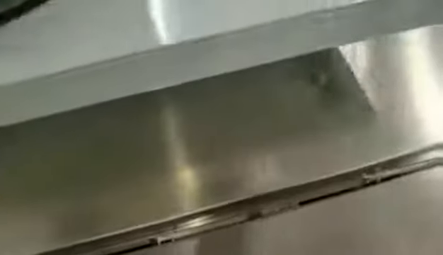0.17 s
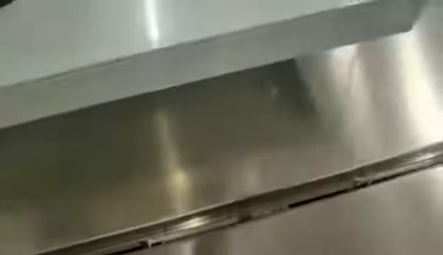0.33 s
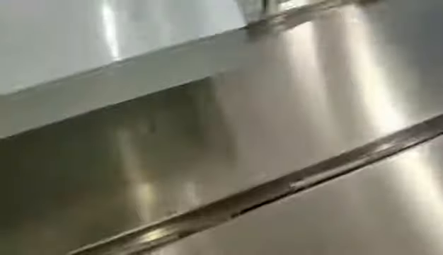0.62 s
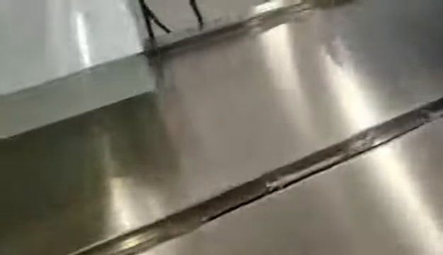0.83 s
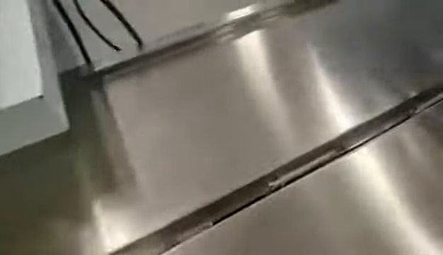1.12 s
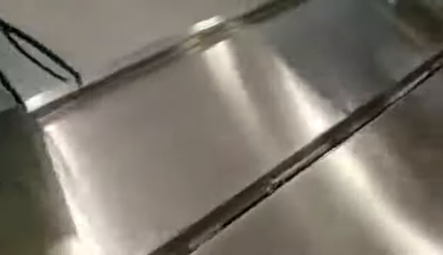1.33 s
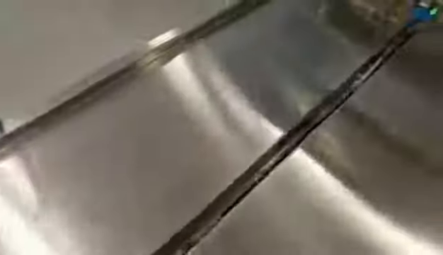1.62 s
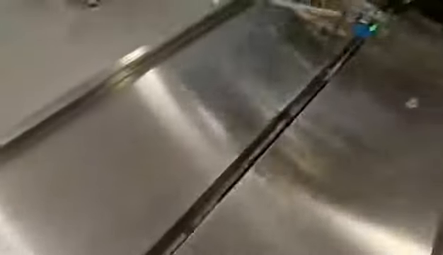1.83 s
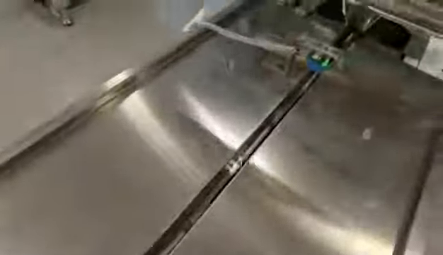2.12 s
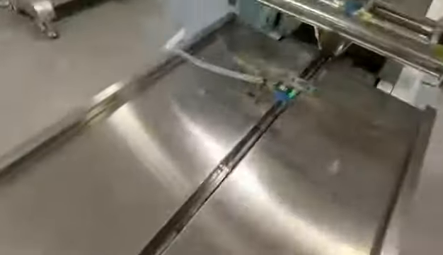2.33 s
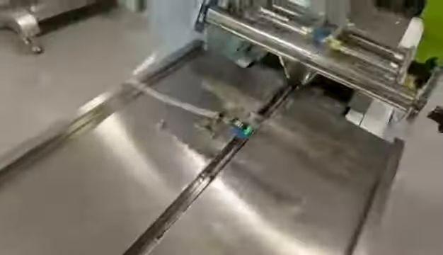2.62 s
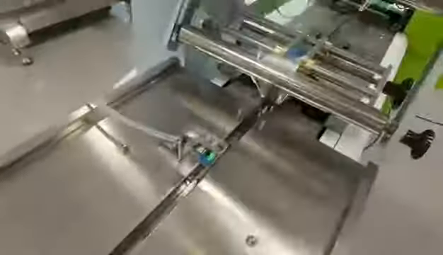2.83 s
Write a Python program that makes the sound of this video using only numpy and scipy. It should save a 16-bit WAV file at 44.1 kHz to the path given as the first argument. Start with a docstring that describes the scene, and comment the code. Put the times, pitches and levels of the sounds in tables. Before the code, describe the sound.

A packaging machine hisses with compressed air, bright and left-leaning, over dull rumble and wavering low hum in a workshop. Carriage knocks clatter softly near 0.2 s, strongly around 0.95, lighter near 1.7 and sharply at 2.44, ringing frame and sheet metal with short room reverberation. Brief air puffs come near 0.8, 1.0, 2.55 and 2.9. From about 1.1 to 1.65 s the hiss drops and stays fainter.

```python
"""Compressed air hisses over a dull rumble and a motor hum, and every three quarters of a second a carriage knocks.
The place is a workshop: the listener walks along a packaging machine's steel deck, away from the air jets.
Air and rumble are banded noise, the hum is five mains harmonics, and exhaust puffs are short noise bursts.
Each knock is a few contacts that ring the frame and its sheet-metal panels, close by and in the room.
Two microphone ports, left and right, hear it all; narrow patches of the noises swell and fade."""
import sys
import numpy as np
from scipy import signal
from scipy.fft import rfft, irfft
from scipy.io import wavfile
from scipy.ndimage import uniform_filter1d

SR = 44100
rng = np.random.default_rng(int(sys.argv[2]) if len(sys.argv) > 2 else 0)


def boost(x):
    """Linear amplitude factor 10**(x/20) for a level x in decibels (scalar or array-like)."""
    u = np.asarray(x, float) / 20
    return 10 ** u


def to_wav(s):
    """Save 16-bit WAV."""
    ch = np.atleast_2d(s).T  # columns
    pcm = np.round(np.clip(ch, -1, 1) * 32767)  # PCM
    wavfile.write(sys.argv[1], SR, pcm.astype(np.int16))


N = 130977

# Hiss of the air jets before its trim: t/s, level/dB, left over right/dB
AIR_LEVEL = [(0.0, -27, 9.5), (0.04, -31.5, -0.5), (0.07, -27, 8.5), (0.17, -29.5, 4.5), (0.42, -28.5, 5),
             (0.58, -31, 5.5), (0.84, -28.5, 2.5), (0.87, -33, 6), (0.95, -27.5, 4.5), (1.1, -28.5, 4.5),
             (1.65, -35.5, 2.5), (1.77, -36, 4.5), (2.4, -36, 1), (2.47, -32.5, 2), (2.74, -37, 5),
             (2.97, -36, 4)]
# Relative spectrum of the jets: f/Hz, density/dB per Hz
AIR_SPECTRUM = [(800, -10), (975, -6), (1250, -12.5), (1600, -7.5), (2060, -1), (2500, -10), (3200, -4.5),
                (3800, -7.5), (4700, -6.5), (5800, 1), (6600, -0.5), (7700, -2)]
# Workshop rumble before its trim, dipping just before each stroke lands: t/s, level/dB
RUMBLE_LEVEL = [(0, -26.5), (.12, -33), (.3, -33), (.5, -35.5), (.8, -34.5), (.88, -38.5), (.93, -31.5),
                (1.17, -35.5), (1.31, -35), (1.55, -32.5), (1.63, -40), (1.69, -31), (1.9, -36),
                (2.05, -37), (2.2, -35.5), (2.38, -36), (2.46, -32.5), (2.6, -35.5), (2.97, -34.5)]
# Relative spectrum of the rumble: f/Hz, density/dB per Hz
RUMBLE_SPECTRUM = [(15, -21.5), (30, -13.5), (71, -4), (158, 0), (322, -3), (388, -10.5), (647, -13),
                   (1060, -15), (1500, -15.5), (2040, -15), (4000, -22), (5200, -59), (8800, -120)]
# Motor hum as the listener crosses its standing waves: t/s, level/dB of harmonics 1, 2, 3, 4, 5
HUM_LEVEL = [(0.0, -29, -45, -27.5, -24, -36.5), (0.11, -32, -44, -47.5, -55, -41.5),
             (0.261, -33, -38, -30, -31, -31), (0.36, -29, -34.5, -36, -44.5, -58),
             (0.43, -35, -66, -35.5, -35.5, -50.5), (0.801, -36.5, -33, -35.5, -40.5, -33.5),
             (0.88, -36, -37, -50, -68, -69), (0.94, -35.5, -34, -36, -32, -27.5),
             (1.22, -32.5, -42.5, -43, -38.5, -47.5), (1.35, -40, -31.5, -43, -35.5, -37),
             (1.5, -40.5, -33, -32, -45, -58), (1.56, -43, -29.5, -28, -39.5, -43),
             (1.63, -40, -35, -58, -59, -53), (1.69, -41.5, -41, -58, -41, -27),
             (1.96, -45, -53, -49.5, -43.5, -52.5), (2.31, -46, -29.5, -37.5, -59, -54),
             (2.42, -51.5, -36.5, -70, -39.5, -37.5), (2.97, -60, -36, -31.5, -42, -41)]
# Balance of the hum, one value a harmonic: left over right/dB
HUM_LEFT_DB = [8.3, 4.3, 5.9, 5.3, 1.4]
# Mean phase lag of the hum at the right port, one value a harmonic: phase/rad
HUM_RIGHT_RAD = [0.86, 0.51, .2, 0.22, 0.15]
# Faint whistles in the air, before they follow the hiss: f/Hz, level/dB
WHISTLES = [(1650, -58.5), (2085, -51.5), (2552, -69.5), (5929, -62), (6093, -65), (6410, -67), (7406, -59)]
# Carriage contacts: t/s, level into the frame/dB, level into the panels/dB
CONTACTS = [(0.182, -19, -25), (0.233, -18.5, -25.5), (0.279, -23, -51), (0.572, -26, -41.5),
            (0.739, -21, -31), (0.917, -25.5, -21), (.942, -14, -23.5), (0.964, -25, -31.5),
            (.994, -18, -28), (1.019, -36, -23.5), (1.044, -34, -49.5), (1.31, -26.5, -49),
            (1.349, -25.5, -36.5), (1.668, -26.5, -29), (1.701, -22, -30.5), (1.723, -26, -29.5),
            (1.739, -25, -38), (1.776, -31, -28), (2.414, -26, -27), (2.434, -26, -18.5),
            (2.441, -12, -24.5), (2.457, -17.5, -30.5), (2.478, -17.5, -29.5), (2.496, -22, -33.5),
            (2.512, -26, -35), (2.535, -25, -46.5), (2.699, -31, -57), (2.89, -30.5, -56)]
# Ringing modes of the frame: f/Hz, relative level/dB, t60/s
FRAME_MODES = [(197, -0.5, 0.15), (222.5, 2, 0.13), (243, -3, 0.071), (301.6, -3, 0.13),
               (340.5, -2.5, 0.13), (366.4, -8, 0.095), (413, -9, 0.22), (446, -9.5, 0.089),
               (517.4, -10, 0.08), (627, -19, 0.044)]
# Ringing modes of the sheet-metal panels: f/Hz, relative level/dB, t60/s
PANEL_MODES = [(940, -12, 0.055), (1161, -8.5, 0.088), (1357, -3.5, 0.041), (1588, -5.5, 0.068),
               (1783, -4.5, 0.036), (1927, 1, 0.079), (2003, -2, 0.044), (2087, -0.5, 0.06),
               (2240, -8, .04), (2366, -8.5, 0.049), (2534, -6, 0.099), (2786, -3, 0.12),
               (3050, -11.5, .04), (3170, -14, .05)]
# Exhaust puffs of the valves: t/s, level/dB, decay t60/s
VALVE_PUFFS = [(0.816, -21.5, 0.17), (0.999, -28.5, 0.21), (2.45, -40, 0.31), (2.553, -32, 0.17),
               (2.88, -32.5, 0.16)]
# Share of the noise power that both ports have in common: f/Hz, likeness 0 to 1
LIKENESS = [(60, 0.97), (240, 0.91), (500, 0.61), (800, 0.3), (1200, 0.41), (2000, 0.22), (2600, 0.32),
            (3700, 0.25), (8000, 0.051)]

MAINS_HZ = 50.08
HUM_WAVER_DB, HUM_WANDER_RAD = 2.5, 0.55
AIR_BUZZ = 0.045  # depth of the motor's pulse in the jets
WHISTLE_WIDTH_HZ = 12  # of each of the two resonators in a row
RIGHT_LAG_S, LAG_ABOVE_HZ = 0.0004, 850
CONTACT_S, RATTLE_S, MODE_SPREAD_DB = 0.003023, 0.019, 4
KNOCK_LOW_HZ, KNOCK_LEFT_DB, PANEL_LIKENESS = 171, 4, 0.4
PUFF_LOW_HZ, PUFF_RISE_S = 2500, 0.012
ROOM_T60_S, WALL_CUT_HZ, ROOM_DB = 0.34, 2200, -11
# Patches in the noises: depth against a plain gain of 1, power share of each port's own pattern
PATCH_SHARE, PATCH_OWN = 0.49, 0.66
PATCH_HZ, PATCH_S = 110, 0.064  # smoothing width of each of two passes
CUTOFF_HZ = 7520


def rms_one(x):
    """Scale to rms 1."""
    return x / np.sqrt(np.mean(x ** 2) + 1e-20)


def in_time(rows):
    """Read the columns of a curve, one value a sample."""
    s, *columns = np.transpose(rows)
    return [np.interp(np.arange(N) / SR, s, column) for column in columns]


def at_hz(points, hz):
    """Read a spectrum on a log-frequency axis."""
    f, value = np.transpose(points)
    return np.interp(np.log(hz), np.log(f), value)


def lean_left(db):
    """Gains of the left and right port, db apart."""
    return boost(np.array([[0.5], [-0.5]]) * db)


def at_ports(alike, lag, both, left, right):
    """Mix shared noise, later by lag samples at the right port, with noise of each port's own."""
    shared = np.array([both, np.roll(both, lag)])
    own = np.array([left, right])
    return np.sqrt(alike) * shared + np.sqrt(1 - alike) * own


def drift(rate_hz):
    """Slow random wandering of rms about 1: low-passed noise."""
    step = 40  # samples between drawn values
    r = np.exp(-2 * np.pi * rate_hz * step / SR)
    noise = rng.standard_normal(N // step + 2002)
    slow = rms_one(signal.lfilter([1], [1, -2 * r, r * r], noise)[2000:])  # settled part
    return np.interp(np.arange(N) / step, np.arange(len(slow)), slow)


def ring(clicks, hz, t60):
    """Two-pole resonator: a unit click starts a decaying sine of height 1."""
    r, w = boost(-60 / (t60 * SR)), 2 * np.pi * hz / SR
    return signal.lfilter([0, np.sin(w)], [1, -2 * r * np.cos(w), r * r], clicks + 1e-18)


def banded_noise(spectrum, patchy_db, shared_db, count):
    """Narrow bands (count an octave) of stereo noise, each with its level, flicker and likeness; mid rms 1."""
    out, together = 0, drift(12.0)
    edges = 14 * 2 ** np.arange(0, 9.3, 1 / count)
    white = rng.standard_normal((2, 3, N))  # neighbouring bands take turns
    for k, (low, high) in enumerate(zip(edges, edges[1:])):
        hz = np.sqrt(low * high)
        if not spectrum[0][0] < hz < spectrum[-1][0]:
            continue
        band = signal.butter(2, [low, high], "band", fs=SR, output="sos")
        alike = np.clip(at_hz(LIKENESS, hz), 0, 1)
        lag = int(RIGHT_LAG_S * SR) * (hz > LAG_ABOVE_HZ)
        gain = boost(at_hz(spectrum, hz) + patchy_db * drift(14.8) + shared_db * together)
        out = out + gain * at_ports(alike, lag, *signal.sosfilt(band, white[k % 2]))
    return out / np.sqrt(np.mean(out.mean(axis=0) ** 2))


def whistle(hz, db):
    """Noise through two equal resonators in a row leaves a faint unsteady tone."""
    t60 = np.log(1000) / (np.pi * WHISTLE_WIDTH_HZ)
    once = ring(rng.standard_normal(N), hz, t60)
    return boost(db) * rms_one(ring(once, hz, t60))


def air():
    """Bright jet noise, slightly pulsed by the motor, with faint whistles that follow its level."""
    level_db, left_db = in_time(AIR_LEVEL)
    pulse = 1 + AIR_BUZZ * np.sin(2 * np.pi * MAINS_HZ * np.arange(N) / SR)
    jets = pulse * banded_noise(AIR_SPECTRUM, patchy_db=2.0, shared_db=0.58, count=6)
    whistles = np.array([sum(whistle(hz, db) for hz, db in WHISTLES) for _ in "LR"])
    mixed = jets * boost(level_db + 1.0) + whistles * boost(level_db - level_db.mean())
    return mixed * lean_left(left_db)


def rumble():
    """Broad dull noise of drives and belts across the workshop."""
    level_db, = in_time(RUMBLE_LEVEL)
    noise = banded_noise(RUMBLE_SPECTRUM, patchy_db=2.5, shared_db=1.0, count=3)
    return boost(level_db + 1.5) * noise * lean_left(4.2)


def hum():
    """Five mains harmonics, each wavering in level and phase, lagging at the right port."""
    t, out = np.arange(N) / SR, 0
    harmonics = zip(in_time(HUM_LEVEL), HUM_LEFT_DB, HUM_RIGHT_RAD)
    for number, (db, left_db, right_rad) in enumerate(harmonics, 1):
        phase = 2 * np.pi * (number * MAINS_HZ * t + rng.random()) + HUM_WANDER_RAD * drift(8.8)
        right_phase = phase - right_rad * (1 + 0.27 * drift(0.45))
        port_waver_db = 1.9 * np.array([drift(4.5), drift(2.9)])
        level = np.sqrt(2) * boost(db + HUM_WAVER_DB * drift(9.5) + port_waver_db)
        out = out + level * np.sin([phase, right_phase]) * lean_left(left_db)
    return out


def patches(x):
    """A smoothed random gain over time and frequency: narrow patches of the spectrum swell and fade."""
    hz, s, cells = signal.stft(x, SR, nperseg=1024, noverlap=896)
    # three random patterns, one shared and one for each port, with real and imaginary parts
    field = rng.standard_normal((3, 2) + cells.shape[1:])
    for axis, width in ((2, PATCH_HZ / hz[1]), (3, PATCH_S / (s[1] - s[0]))):
        for _ in range(2):
            field = uniform_filter1d(field, max(int(width), 1), axis=axis)
    field = (field[:, 0] + 1j * field[:, 1]) / field.std()
    patch = np.sqrt(1 - PATCH_OWN) * field[0] + np.sqrt(PATCH_OWN) * field[1:]
    gain = np.abs(1 + PATCH_SHARE * patch) / np.sqrt(1 + 2 * PATCH_SHARE ** 2)  # mean power kept
    return signal.istft(cells * gain, SR, nperseg=1024, noverlap=896)[1][:, :N]


def knocks():
    """Each contact shoves the frame modes, alike at both ports, and rattles the panel modes with dying noise."""
    s, frame_db, panel_db = np.transpose(CONTACTS)
    out, at = 0, (s * SR).astype(int)
    modes = [*FRAME_MODES, *PANEL_MODES]
    chance = rng.standard_normal((len(s), len(modes), 2))
    fade = np.exp(-1 / (RATTLE_S * SR))
    for k, (hz, db, t60) in enumerate(modes):
        clicks, frame = np.zeros(N), k < len(FRAME_MODES)
        contact_db = frame_db if frame else panel_db
        strength = boost(contact_db + db - 6.5 + MODE_SPREAD_DB * chance[:, k, 0])
        if frame:
            late = (CONTACT_S * SR * np.abs(chance[:, k, 1])).astype(int)  # random delay of each shove
            clicks[at + late] = strength
        else:
            clicks[at] = strength
            rattle = at_ports(PANEL_LIKENESS, int(RIGHT_LAG_S * SR), *rng.standard_normal((3, N)))
            dying = signal.lfilter([np.sqrt(1 - fade ** 2)], [1, -fade], clicks + 1e-18)
            clicks = dying * rattle
        out = out + ring(clicks, hz, t60) * np.ones((2, 1))
    return signal.sosfilt(signal.butter(2, KNOCK_LOW_HZ, "high", fs=SR, output="sos"), out)


def workshop(x):
    """Room sound from eight feedback delays a side, duller on every round."""
    out, dull = np.zeros((2, N)), np.exp(-2 * np.pi * WALL_CUT_HZ / SR)
    lags = (rng.uniform(0.013, 0.043, 16) * SR).astype(int)
    for k, lag in enumerate(lags):
        loop, gain, state = x.copy(), boost(-60 * lag / SR / ROOM_T60_S), [0.]
        for i in range(lag, N, lag):
            back, state = signal.lfilter([gain * (1 - dull)], [1, -dull], loop[i - lag:i], zi=state)
            loop[i:i + lag] += back[:N - i]
        out[k % 2] += (loop - x) * (-1) ** (k // 2)  # sides take turns, signs alternate
    return out


def puffs():
    """Short exhaust bursts: bright noise that rises quickly and dies exponentially."""
    t, shape = np.arange(N) / SR, 0
    for s, db, t60 in VALVE_PUFFS:
        rise = np.clip((t - s) / PUFF_RISE_S, 0, 1)
        shape = shape + rise * boost(db - 60 * np.maximum(t - s, 0) / t60)
    band = signal.butter(2, [PUFF_LOW_HZ, 7500], "band", fs=SR, output="sos")
    noise = rms_one(signal.sosfilt(band, rng.standard_normal((2, N))))
    return shape * noise * boost(np.array([[3.1], [-1.1]]))  # left, right/dB


def scene():
    """All sources at the two ports: patchy noises, wavering hum, near knocks and their room."""
    noises = patches(air() + rumble() + puffs())
    hits = knocks()
    near = hits * lean_left(KNOCK_LEFT_DB)
    room = boost(ROOM_DB) * workshop(hits.mean(axis=0))
    return noises + hum() + near + room


def top_cut(x):
    """Nothing passes above the cut-off."""
    return signal.sosfilt(signal.butter(12, 8820, fs=SR, output="sos"), x)


def record(dry):
    """The microphone signal with every frequency from CUTOFF_HZ up removed."""
    spectrum = rfft(dry) * (np.fft.rfftfreq(N, 1 / SR) < CUTOFF_HZ)
    mix = irfft(spectrum, N)
    return top_cut(mix)


dry = scene()
out = record(dry)
to_wav(out)
```